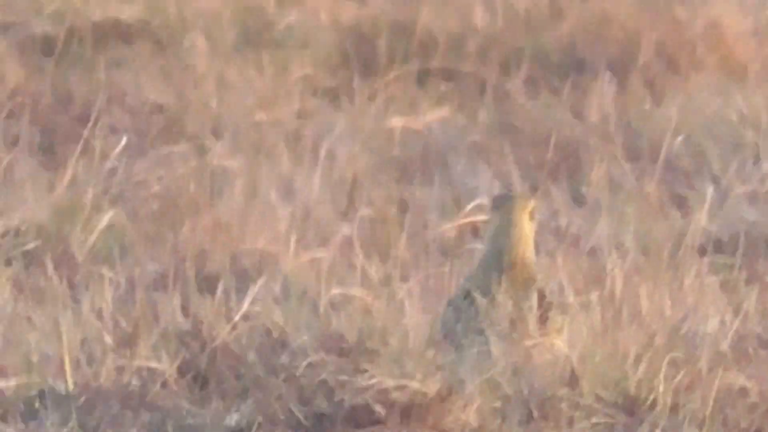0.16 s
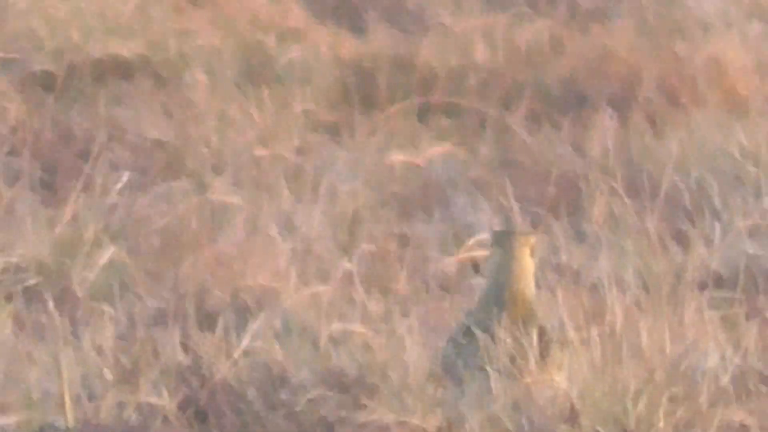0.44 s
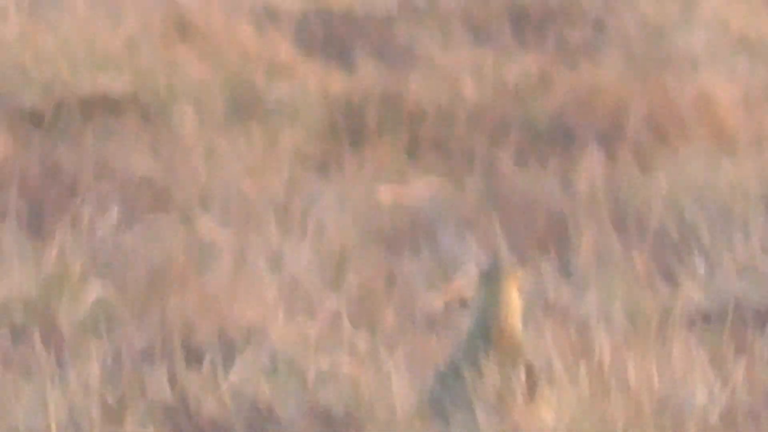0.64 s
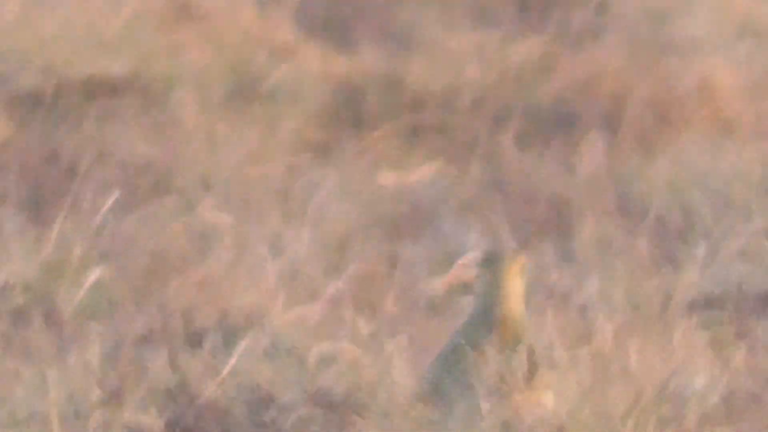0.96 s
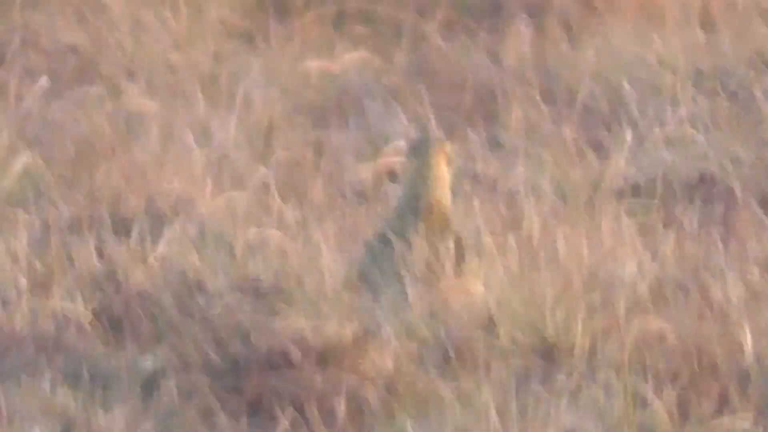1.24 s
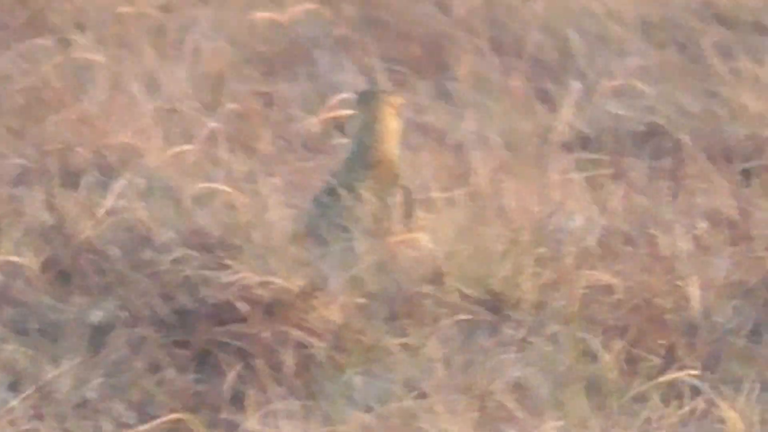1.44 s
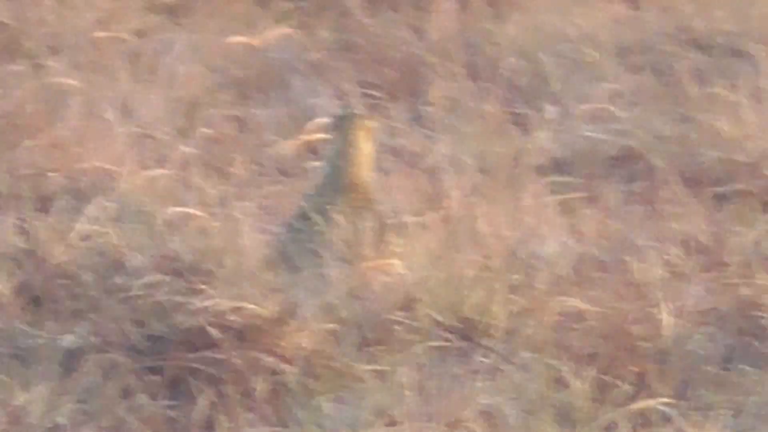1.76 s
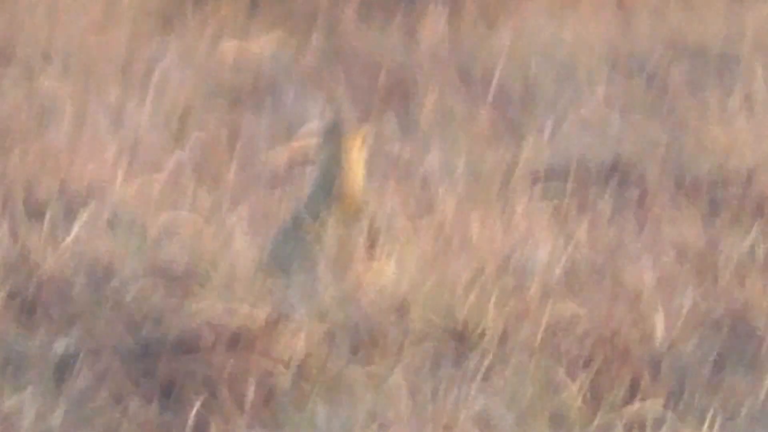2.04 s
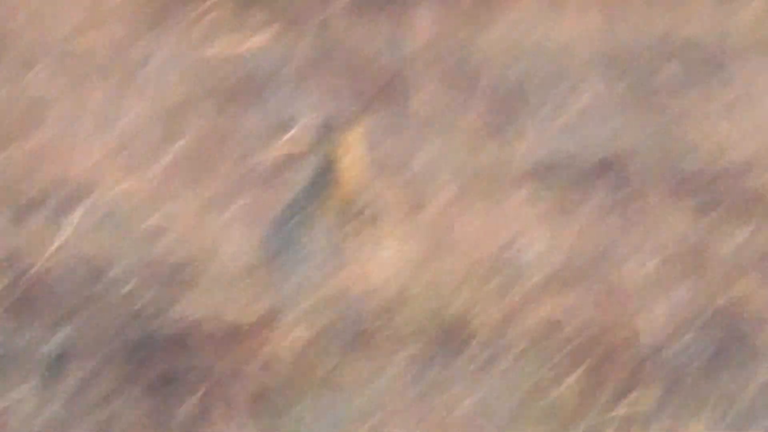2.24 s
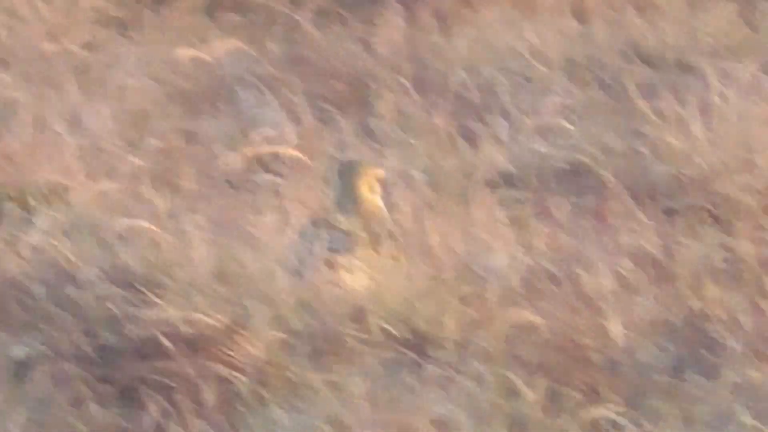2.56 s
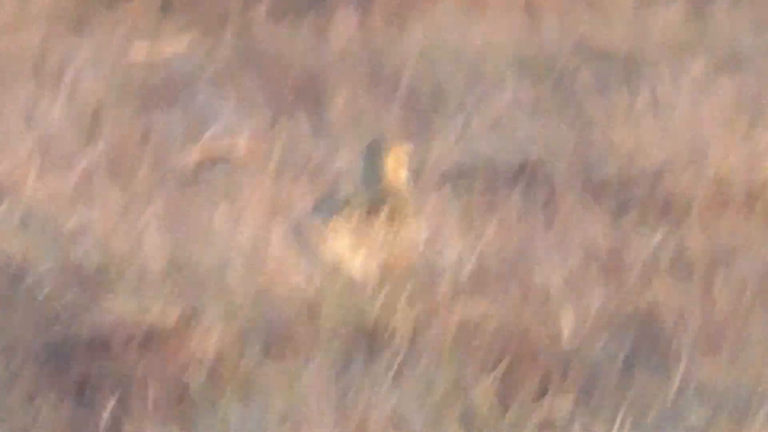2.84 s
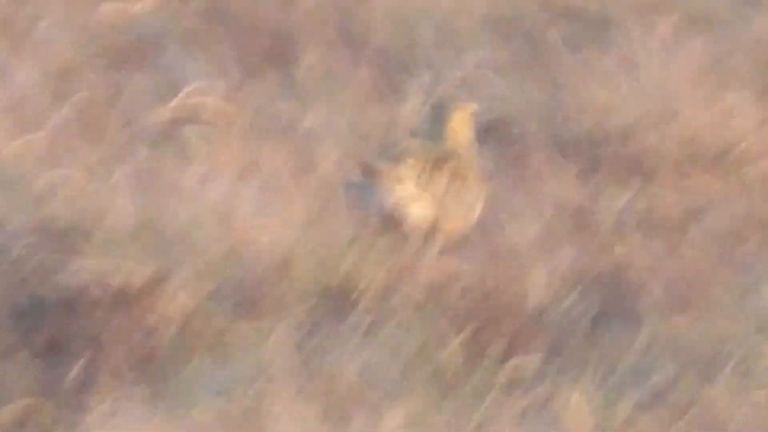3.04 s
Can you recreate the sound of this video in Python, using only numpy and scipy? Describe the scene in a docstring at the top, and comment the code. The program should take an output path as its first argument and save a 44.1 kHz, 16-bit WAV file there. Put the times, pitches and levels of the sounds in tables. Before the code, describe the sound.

One clear, slightly rising bird whistle sounds midway through hollow, fluttering wind rumble on the microphone. Faint, distant small birds chirp across the moor, then a plastic camera button is pressed and released with two sharp clicks.

```python
"""A plover gives one clear, slowly rising whistle on open moorland; small birds twitter far away.
Wind on a hand-held camera rumbles in one hollow resonance of its body, over faint microphone hiss.
The lens drive ticks softly fifty times a second. Near the end a button is pressed and let go,
ringing the plastic shell. Birds are swept sines, wind is shaped noise, the button modes and noise."""
import sys
import numpy as np
from scipy import signal
from scipy.fft import rfft, irfft
from scipy.io import wavfile
from scipy.ndimage import uniform_filter1d

SR = 44100
rng = np.random.default_rng(int(sys.argv[2]) if len(sys.argv) > 2 else 0)


def pcm_store(signal):
    """Save signal as 16-bit PCM."""
    levels = np.round(np.clip(np.atleast_2d(signal), -1, 1) * 32767)
    wavfile.write(sys.argv[1], SR, levels.astype(np.int16).T)


N = 141120

# gusts on the camera body: time_s, relative_db
GUSTS = [(0.0, -52), (0.11, -52), (0.34, -40.5), (0.36, -30), (0.41, -36.5), (0.44, -45.5), (0.62, -35),
         (0.81, -39), (0.84, -48.5), (0.94, -39), (1.33, -51.5), (1.36, -40.5), (1.41, -49.5), (1.48, -40),
         (1.52, -47.5), (1.57, -37.5), (1.64, -51.5), (1.72, -45.5), (1.92, -50.5), (1.95, -40.5),
         (2.03, -51), (2.3, -46.5), (2.33, -63), (2.37, -39.5), (2.51, -51), (2.53, -45), (2.86, -44),
         (3.09, -55.5), (3.11, -51), (3.2, -53)]


def plover():
    """Near-pure rising whistle whose overtones dull as it climbs, with a faint echo off the moor."""
    # fundamental: time_s, pitch_hz
    pitch = [(1.372, 2470), (1.3752, 2110), (1.4, 2136), (1.423, 2151), (1.525, 2163), (1.63, 2200),
             (1.72, 2204), (1.757, 2235), (1.766, 2227), (1.776, 2320)]
    # partials 1-3: time_s, first_db, second_db, third_db (relative)
    low_partials = [(1.374, -49.5, -64, -81), (1.39, -46.5, -56, -70), (1.425, -47, -56, -71),
                    (1.51, -47.5, -61, -74), (1.615, -47.3, -68.5, -78.5), (1.757, -48.5, -69, -80),
                    (1.77, -53, -81, -79)]
    # partials 4-6: multiple, relative_db
    high_partials = [(4, -83.5), (5, -88), (6, -84)]
    # each partial at the microphones: left_minus_right_db, left_lead_rad
    arrivals = [(8, .41), (2, 1.78), (10, 1.47), (15, 1.6), (11, 1), (2, 1)]
    start_s, end_s, attack_s, release_s = 1.3722, 1.777, .0017, .0095
    echo_db, echo_t60_s = -26.5, .74
    t = np.arange(start_s, end_s, 1 / SR)
    angle = phase(curve(pitch, t) * (1 + .001 * drift(len(t), rate_hz=70)))
    gate = np.clip((t - t[0]) / attack_s, 0, 1) * np.clip((t[-1] - t) / release_s, 0, 1)
    levels_db = [curve(low_partials, t, column) for column in (1, 2, 3)]
    levels_db += [db for _, db in high_partials]
    direct = np.zeros((2, N))
    for multiple, (db, (side_db, lead_rad)) in enumerate(zip(levels_db, arrivals), start=1):
        shimmer_db = .16 * drift(len(t), rate_hz=70)
        partial = np.sin(multiple * angle - np.array([[0], [lead_rad]]))
        add(direct, start_s, pan(side_db) * gate * amp(db + shimmer_db) * partial)
    tail = rng.standard_normal((2, SR)) * fade(np.arange(SR) / SR, echo_t60_s)
    echo = signal.fftconvolve(direct, tail / np.linalg.norm(tail[0]), axes=1)[:, :N]
    return direct + amp(echo_db) * echo


def hollow(t):
    """Wind blows across one narrow resonance, which wanders in pitch and flutters."""
    # resonance: time_s, centre_hz
    centre = [(0, 290), (.16, 305), (.24, 272), (.37, 290), (.52, 288), (.63, 305), (.76, 268), (.9, 288),
              (1.12, 274), (1.29, 296), (1.38, 258), (1.57, 266), (1.8, 302), (1.97, 285.4), (2.14, 264),
              (2.4, 268), (2.65, 274), (2.86, 284), (3.2, 285)]
    # its spectrum: offset_hz, relative_db
    shape = [(0, -0.5), (18, 1), (38, -7), (65, -18), (110, -34.5), (300, -71.5)]
    lead_rad = .37
    offset_hz = abs(np.fft.fftfreq(N, 1 / SR))
    white = rng.standard_normal(N) + 1j * rng.standard_normal(N)
    flutter = np.fft.ifft(np.fft.fft(white) * amp(log_curve(shape, offset_hz)))
    angle = phase(curve(centre, t)) - np.array([[0], [lead_rad]])
    tone = unit((flutter * np.exp(1j * angle)).real)
    return steadied(tone, samples=1800) * amp(curve(GUSTS, t) - .22) * pan(side_db=4)


def wind(t):
    """Broad rumble of the camera body, a soft rush above it and deep buffeting at each microphone."""
    # noise spectra: frequency_hz, relative_db
    body_colour = [(100, -35.5), (162, -20), (186, -4.5), (203, -17), (222, -17), (250, -0.5), (280, 0.5),
                   (320, -2.5), (360, -3.5), (420, -23.5), (600, -39.5), (1200, -76)]
    rush_colour = [(200, -15), (400, 4.5), (480, -1.5), (600, -1.5), (760, -12.5), (1100, -22), (1700, -32),
                   (4000, -54)]
    buffet_colour = [(15, -40), (30, -22.5), (48, -7.5), (85, 5), (108, -1), (135, 3), (165, -9),
                     (300, -21), (800, -66)]
    # envelopes: time_s, relative_db
    rush_level = [(0, -62.5), (.15, -71), (.27, -60.5), (.37, -58.5), (.45, -64), (.56, -56.5), (.72, -63),
                  (.92, -66.5), (1.3, -67.5), (2, -69.5), (2.4, -64.5), (2.65, -61.5), (2.9, -64),
                  (3.05, -68), (3.2, -70)]
    buffet_level = [(0, -66.5), (.15, -73), (.4, -71.5), (.75, -70.5), (1.05, -68), (1.35, -69.5),
                    (1.7, -73), (2.4, -73.5), (2.72, -64), (2.88, -63), (3.03, -71), (3.15, -64.5),
                    (3.2, -67)]
    body = steadied(noise(body_colour, correlation=.97), samples=4000)
    rush = steadied(noise(rush_colour, correlation=-.11), samples=2600)
    buffet = steadied(noise(buffet_colour, correlation=-.25), samples=6000)
    swell_db = uniform_filter1d(curve(GUSTS, t), size=11000)
    return (body * amp(swell_db - 6.5) * pan(side_db=6)
            + rush * amp(curve(rush_level, t) + 2) * pan(side_db=2)
            + buffet * amp(curve(buffet_level, t) + 7.5) * pan(side_db=-.6))


def button():
    """Press and release: each rings the plastic shell, thuds, and rattles in a few quick snaps."""
    # press, release: start_s, shell_db, thud_db, thud_delay_s, low_modes_db (levels relative)
    clicks = [(2.6882, -27.5, -38.5, 0.00036, -0.5), (2.8581, -30, -34.5, 0.00076, -2)]
    # ringing modes: frequency_hz, relative_db, t60_s
    shell_modes = [(2510, -14, 0.0073), (3510, -16, 0.012), (4230, -6, .014), (4950, -3.5, 0.0083),
                   (7000, -15, .009), (7170, -8.5, 0.016), (8900, -13, .009), (9040, -5.5, .01),
                   (10000, 2, 0.0079), (11000, -15, 0.0091), (11900, -17, .01), (13700, -16, .009)]
    thud_modes = [(294, -2, .02), (710, -5.5, .012), (850, -3.5, 0.014), (1136, -6.5, 0.01),
                  (1470, -8.5, 0.01)]
    # rattle: start_s, relative_db
    snaps = [(2.688, -36.5), (2.6897, -34.5), (2.6912, -42), (2.695, -38), (2.8569, -41), (2.8585, -31),
             (2.8614, -44), (2.8623, -41.5)]
    # rattle spectrum: frequency_hz, relative_db
    snap_colour = [(200, -15), (800, 1.5), (1500, -3), (2000, -15), (2500, -6.5), (3500, -2.5), (4700, 2.5),
                   (6200, -10), (7200, -17), (10000, 3), (12000, -1.5), (14000, -7), (16000, -21)]
    low_modes_below_hz = 6000
    t = np.arange(2000) / SR
    rings, rattle = np.zeros((2, N)), np.zeros(N)
    for start_s, shell_db, thud_db, delay_s, low_db in clicks:
        modes = [(hz, db + low_db * (hz < low_modes_below_hz), t60_s) for hz, db, t60_s in shell_modes]
        add(rings, start_s, amp(shell_db) * ring(modes, t, scatter_rad=.38))
        thud = ring(thud_modes, t, scatter_rad=.93)
        add(rings, start_s + delay_s, amp(thud_db) * pan(side_db=2) * thud)
    for start_s, db in snaps:
        add(rattle, start_s, amp(db) * fade(t, t60_s=.0046))
    return (rings + rattle * noise(snap_colour, correlation=.38)) * pan(side_db=2)


def ring(modes, t, scatter_rad, rise_s=.00074):
    """Decaying modes that reach the two microphones slightly out of step."""
    lags_rad = scatter_rad * rng.uniform(-1, 1, (len(modes), 1, 1)) * np.array([[1], [-1]])
    rings = sum(amp(db) * fade(t, t60_s) * np.sin(2 * np.pi * hz * t + lag)
                for (hz, db, t60_s), lag in zip(modes, lags_rad))
    return rings * np.minimum(t / rise_s, 1)


def far_twitter(t):
    """A run of quick arched notes, each loudest at the top of its arch."""
    # envelope: time_s, relative_db
    level = [(.95, -81), (1.08, -78), (1.13, -78), (1.3, -69.5), (1.45, -78), (1.6, -84), (1.78, -84)]
    notes_per_s, centre_hz, swing_hz = 48, 2971, 208
    arch = np.sin(phase(notes_per_s * (1 + .29 * drift(N, rate_hz=24.7))))
    pitch_hz = centre_hz + swing_hz * arch + 60 * drift(N, rate_hz=20.5)
    db = curve(level, t) + 2.5 * drift(N, rate_hz=41) + 5 * arch
    gate = (t > level[0][0]) * (t < level[-1][0])
    return amp(db) * gate * np.sin(phase(pitch_hz))


def far_pipe(t):
    """One piping note that rises, then dips."""
    # contour: time_s, pitch_hz, relative_db
    note = [(2.975, 2930, -88), (2.99, 2950, -75), (3.02, 3070, -79), (3.07, 3220, -73), (3.105, 3130, -83),
            (3.12, 3100, -106)]
    pitch_hz = curve(note, t) + 25 * drift(N, rate_hz=150)
    gate = (t > note[0][0]) * (t < note[-1][0])
    return amp(curve(note, t, column=2)) * gate * np.sin(phase(pitch_hz))


def far_song():
    """Repeated phrase: a thin upslur, then quick falling lisps."""
    # song: start_s, relative_db, lisp_pitch_hz
    phrases = [(1.70, -74, 4810), (2.148, -73, 4791), (2.378, -75.5, 4800), (2.6, -72, 4800),
               (2.823, -68, 4520), (3.064, -72.5, 4450)]
    slur_s, slur_hz, rise_hz = .065, 5900, 550
    lisp_delay_s, lisp_s, lisps_per_s, fall_hz, sag_hz = .068, .07, 49, 604, 600
    out = np.zeros(N)
    for start_s, db, lisp_hz in phrases:
        u = np.linspace(0, 1, round(slur_s * SR))
        pitch_hz = slur_hz + rise_hz * u ** 5 + 60 * drift(len(u), rate_hz=500)
        add(out, start_s, amp(db - 6) * chirp(pitch_hz, u))
        u = np.linspace(0, 1, round(lisp_s * SR))
        sawtooth = u * lisp_s * lisps_per_s % 1 - .5
        pitch_hz = lisp_hz - fall_hz * sawtooth - sag_hz * (u - .5) + 220 * drift(len(u), rate_hz=600)
        add(out, start_s + lisp_delay_s, amp(db) * chirp(pitch_hz, u))
    return out


def chirp(pitch_hz, progress):
    """Swept sine that swells and fades as progress runs from 0 to 1."""
    return np.sqrt(abs(np.sin(np.pi * progress))) * np.sin(phase(pitch_hz))


def lens_drive():
    """Evenly spaced tiny ticks of uneven strength, three knocks each."""
    # one tick: delay_s, relative_db
    knocks = [(0, -8), (.0011, -13.5), (.0028, -9)]
    # tick spectrum: frequency_hz, relative_db
    colour = [(800, -18), (1600, 3.5), (2400, 1.5), (3100, -1.5), (3900, 0.5), (5600, -2), (5950, -17),
              (12000, -45)]
    period_s, spread_db, rms_db = .02, 4, -76.5
    starts_s = np.arange(.0003, N / SR, period_s)
    burst = fade(np.arange(800) / SR, t60_s=.0075)
    envelope = np.zeros(N)
    for start_s, loss_db in zip(starts_s, rng.exponential(spread_db, len(starts_s))):
        for delay_s, db in knocks:
            add(envelope, start_s + delay_s, amp(db - loss_db) * burst)
    return amp(rms_db) * pan(side_db=.5) * unit(envelope * noise(colour, correlation=.1))


def hiss():
    """Distant air and the microphones' own hiss."""
    # spectrum: frequency_hz, relative_db
    colour = [(20, 0), (500, 1), (760, 7.5), (890, 18.5), (1020, 10.5), (1350, 8), (1800, -0.5),
              (2300, 3.5), (3000, -3), (3900, 1), (5200, -3), (6200, -7), (7200, 0), (8400, 2.5),
              (10000, 2.5), (13000, 2), (15700, -2)]
    # channel likeness: frequency_hz, correlation
    likeness = [(100, .3), (900, 0.13), (2000, 0.067), (5000, 0.046), (15000, .1)]
    # balance: frequency_hz, left_minus_right_db
    balance = [(100, -8), (900, 3), (1500, 0.5), (2400, 3.5), (3800, 0), (6000, 0.5), (14000, 1)]
    hz = np.fft.rfftfreq(N, 1 / SR)
    air = noise(colour, log_curve(likeness, hz))
    return amp(-66.5) * irfft(rfft(air) * pan(log_curve(balance, hz)), N)


def amp(db):
    """Decibels to gain."""
    return 10 ** (np.asarray(db) / 20)


def unit(x):
    """Scales to rms 1."""
    return x / np.sqrt(np.mean(x ** 2) + 1e-20)


def curve(rows, t, column=1):
    """Interpolates a table column over time."""
    rows = np.array(rows)
    return np.interp(t, rows[:, 0], rows[:, column])


def log_curve(rows, hz):
    """Interpolates a table over log frequency."""
    row_hz, value = np.transpose(rows)
    return np.interp(np.log(hz + 1), np.log(row_hz + 1), value)


def pan(side_db):
    """Stereo gains, left side_db above right."""
    return amp(np.array([[.5], [-.5]]) * side_db)


def fade(t, t60_s):
    """Exponential decay."""
    return np.exp(-np.log(1000) * t / t60_s)


def add(mix, start_s, sound):
    """Mixes a sound in at start_s."""
    part = mix[..., round(start_s * SR):][..., :sound.shape[-1]]
    part += sound[..., :part.shape[-1]]


def drift(n, rate_hz):
    """Smooth random wander of rms 1."""
    hz = np.fft.rfftfreq(n, 1 / SR)
    return unit(irfft(rfft(rng.standard_normal(n)) * np.exp(-(hz / rate_hz) ** 2), n))


def phase(hz):
    """Running phase of a pitch curve."""
    return 2 * np.pi * np.cumsum(hz) / SR


def noise(colour, correlation):
    """Coloured stereo noise of rms 1, channels partly alike."""
    left, independent = rfft(rng.standard_normal((2, N)))
    right = correlation * left + np.sqrt(1 - correlation ** 2) * independent
    gain = amp(log_curve(colour, np.fft.rfftfreq(N, 1 / SR)))
    return unit(irfft(np.array([left, right]) * gain, N))


def steadied(x, samples):
    """Evens out slow swells, keeps quick flutter."""
    power = uniform_filter1d(uniform_filter1d((x ** 2).mean(0), samples), samples)
    return x / np.sqrt(abs(power) + 1e-9)


def scene():
    """Everything that reaches the microphones."""
    t = np.arange(N) / SR
    whistle = amp(2.5) * plover()
    far_birds = amp(-2.5) * pan(side_db=4) * (far_twitter(t) + far_pipe(t) + far_song())
    return whistle + far_birds + wind(t) + hollow(t) + hiss() + lens_drive() + button()


def record(dry):
    """The recorder's band limit."""
    cutoff_hz = 15800
    taps = signal.firwin(511, cutoff_hz, window=("kaiser", 9), fs=SR)
    return signal.oaconvolve(dry, taps[None], "same")


dry = scene()
out = record(dry)
pcm_store(out)
```